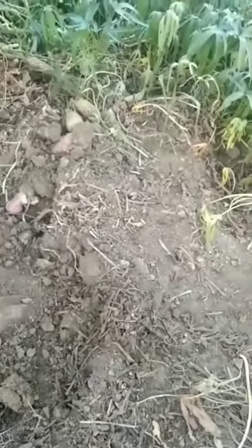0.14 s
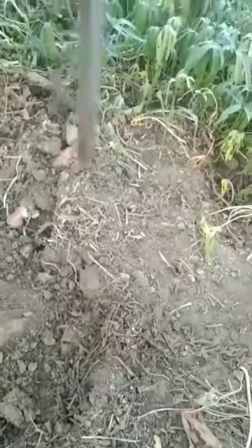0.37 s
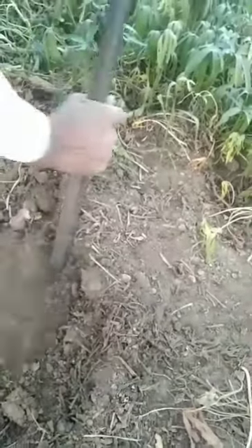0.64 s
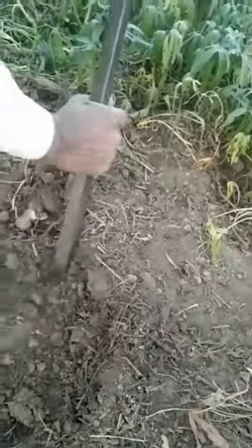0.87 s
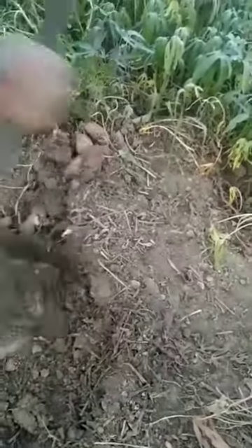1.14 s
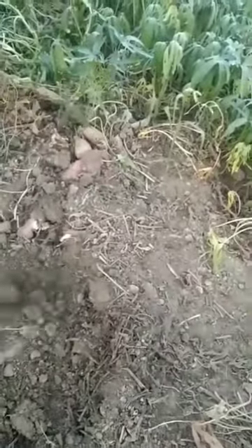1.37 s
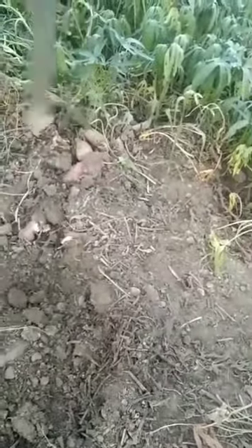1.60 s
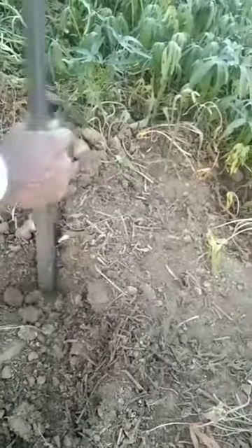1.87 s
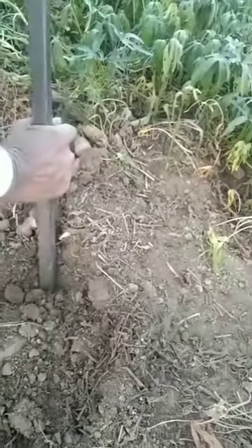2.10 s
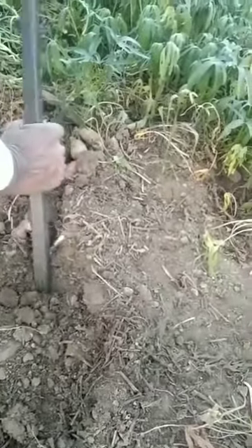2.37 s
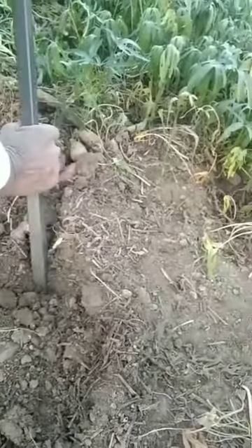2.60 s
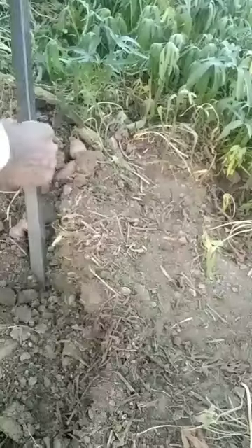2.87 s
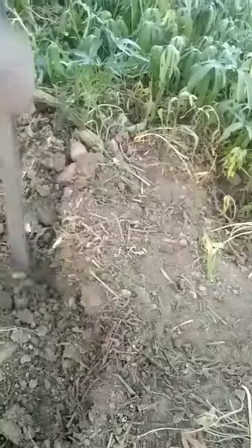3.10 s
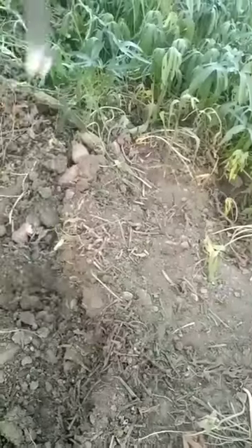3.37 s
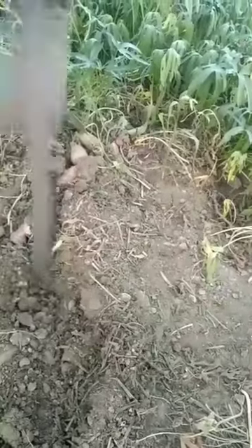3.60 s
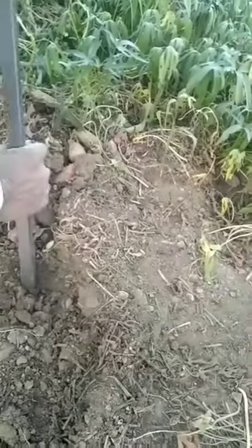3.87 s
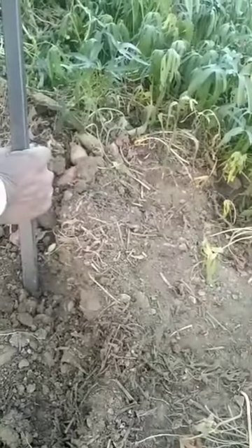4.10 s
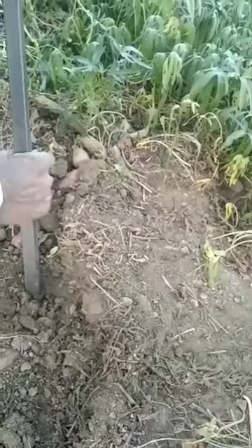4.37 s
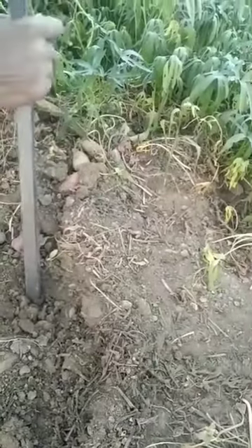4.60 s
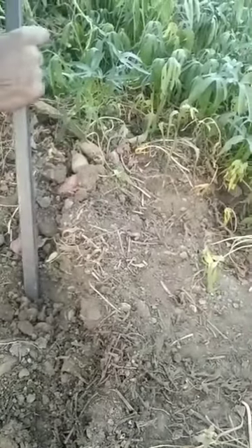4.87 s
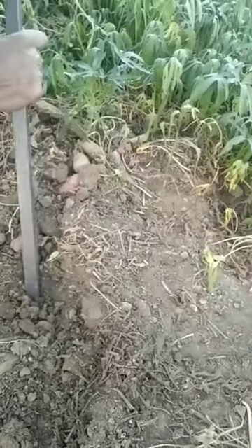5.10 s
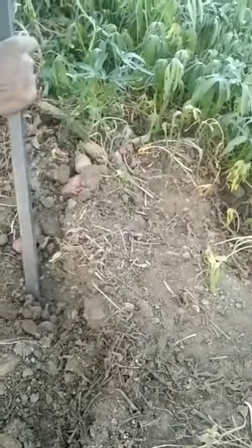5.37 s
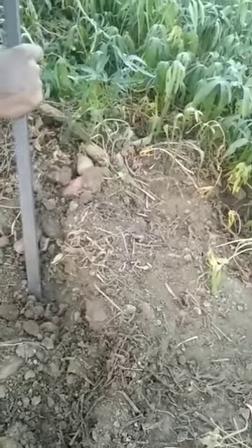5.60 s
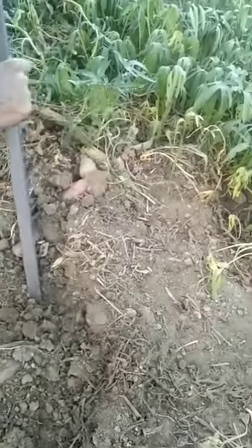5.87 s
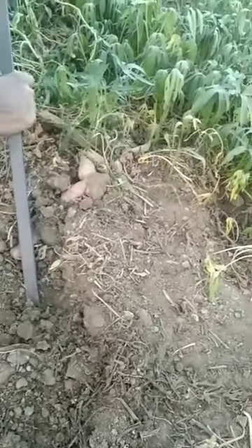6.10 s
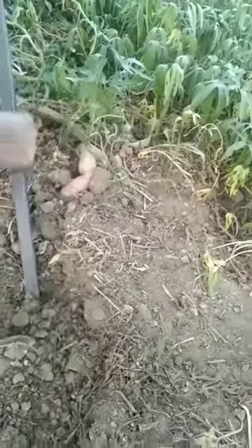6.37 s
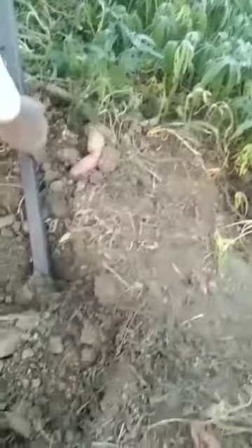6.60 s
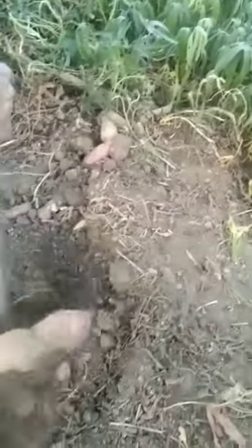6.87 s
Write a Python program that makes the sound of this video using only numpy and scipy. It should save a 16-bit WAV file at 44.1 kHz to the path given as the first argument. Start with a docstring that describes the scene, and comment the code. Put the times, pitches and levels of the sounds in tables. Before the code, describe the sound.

Three hard metal-on-stone strikes crunch into dry ground, each followed by trickling earth and ticking pebbles, while a bird whistles softly over a faint far rumble.

```python
"""A steel digging bar is driven three times into dry stony soil, dragged and wiggled; stones make it ring.
The ring is a set of fading sine waves, tapped by knocks or rubbed by rough noise, damped as the tip sinks in.
Knocks and ticks are short noise bursts; thumps are low sagging tones; grit, clods and slumps are shaped noise.
Narrow noise bands make faint hoarse tones and thin high streaks of the bar's ring; a bird chirps across the
field in gliding tones with echoes; a far engine rumbles faintly as low noise with two wavering tones."""
import sys
import numpy as np
from scipy import signal
from scipy.fft import rfft, irfft, next_fast_len
from scipy.io import wavfile
from scipy.ndimage import uniform_filter1d

SR = 44100
rng = np.random.default_rng(int(sys.argv[2]) if len(sys.argv) > 2 else 0)


def field_ratio(decibels):
    """Amplitude ratio for a level in dB (20 dB per decade); scalars and array-likes work."""
    return 10 ** (np.asarray(decibels, dtype=float) / 20)


def persist_wave(psi):
    """Save psi, clipped to +-1, as 16-bit WAV."""
    counts = np.round(np.clip(psi, -1, 1) * 32767).astype(np.int16)
    wavfile.write(sys.argv[1], SR, np.atleast_2d(counts).T)


N = 307818  # length in samples


def evened(x):
    """Scales to an average strength (rms) of 1."""
    return x / np.sqrt(np.mean(x ** 2) + 1e-20)


def coloured(x, points):
    """Filters x through a curve of (f/Hz, level/dB) points, then scales it to rms 1."""
    size = next_fast_len(len(x))
    hz, db = np.transpose(points)
    bins_hz = np.fft.rfftfreq(size, 1 / SR)
    gain = field_ratio(np.interp(np.log(bins_hz + 1), np.log(hz), db, left=-90, right=-90))
    return evened(irfft(rfft(x, size) * gain, size)[:len(x)])


def smooth_noise(noise, size):
    """Averages noise twice over a few samples, so that it wanders slowly, at rms 1."""
    return evened(uniform_filter1d(uniform_filter1d(noise, size=size), size=size))


def add(mix, s, sound):
    """Mixes a sound in at time s, in seconds."""
    part = mix[max(round(s * SR), 0):][:len(sound)]
    part += sound[:len(part)]


def dying(t60, length):
    """Time axis and an envelope that falls 60 dB in t60 seconds."""
    t = np.arange(round(length * SR)) / SR
    return t, field_ratio(-60 * t / np.maximum(t60, .002))


def grit(per_s, spread_db, t60, hiss):
    """Grains of uneven size, each a tiny burst of noise, over a dense hiss of dust."""
    size = field_ratio(spread_db * np.minimum(rng.exponential(1, N), 4))
    hits = size * (rng.random(N) < per_s / SR)
    bursts = signal.oaconvolve(hits, dying(t60, .03)[1])[:N]
    return (evened(bursts) + hiss) * rng.standard_normal(N)


# ways the bar vibrates, before the touched spot weighs them: (f/Hz, level/dB, time to fall 60 dB t/s)
BAR_MODES = [(861, -22, .11), (1360, -13, .12), (1935, -10, .1), (2120, -12, .1), (2615, -2, .09),
             (2890, -10, .08), (3400, 0, .09), (3815, -11, .08), (4285, -3, .09), (5250, -8, .1),
             (5880, -14, .1), (6265, -6, .09), (7080, -12, .1), (7375, -9, .08), (8290, -11, .08),
             (8560, -11, .09), (9780, -17, .06), (11200, -19, .06)]


def bar_ring(bright_db, spot, scatter_db):
    """The modes after one tap; a bending wave with a node near the touched spot stays weak."""
    hz, db, t60 = np.transpose(BAR_MODES)[:, :, None]
    half_waves = np.sqrt(hz / 52)  # bending modes rise with the square of their number
    reach = np.sqrt(np.cos(np.pi * half_waves * spot) ** 2 + .06)
    t, fall = dying(t60, 0.22)
    tilt_db = bright_db * np.log2(hz / 3400)  # bright_db is per octave
    gain = reach * field_ratio(db + tilt_db + scatter_db[:, None])
    side = (-1.) ** np.arange(len(BAR_MODES))[:, None]  # neighbouring modes start in opposite directions
    modes = side * gain * fall * np.sin(2 * np.pi * hz * t)
    return modes.sum(0) * np.minimum(t / 0.00016, 1)


# the bar knocking on stones: (t/s, level/dB, dull part level/dB re knock, bar ring level/dB re knock)
KNOCKS = [(0.274, -14.5, -30.5, -32), (0.2835, -11.5, -8, -18.5), (0.2894, -7.5, -8.5, -23),
          (0.2934, -9.5, -17, -25), (.3250, -7, -17.5, -20), (0.3294, -16, -18.5, -25),
          (0.8739, -25.5, -11.5, -17), (1.1051, -27, -34, -25), (1.1904, -38.5, -3, -33),
          (1.2035, -28, -4, -29), (1.2095, -30, -9.5, -23), (1.3272, -54, 12.5, -20),
          (1.694, -21.5, -42.5, -23), (1.712, -15.5, -27, -21), (1.7159, -13.5, -14.5, -22.5),
          (1.7326, -27, -27, -26.5), (2.8702, -49, -29.5, -30), (3.4588, -23.5, -7.5, -15.5),
          (3.4683, -20, -1.5, -33), (3.4786, -8.5, -15, -16.5), (3.4913, -22, -9.5, -23.5),
          (3.5104, -29.5, -18, -30.5), (4.5974, -49.5, -12.5, -16.5), (5.1986, -43, -17, -26.5),
          (5.4897, -54.5, 12.5, -22), (6.4751, -56, -21.5, -30), (6.5621, -31, -20, -18.5),
          (6.746, -33.5, -50, -21), (6.8249, -45.5, -32, -4), (6.9655, -36.5, -16.5, 6)]
# pebbles ticking: (t/s, level/dB)
TICKS = [(0.6164, -41.5), (0.833, -42), (1.0166, -26.5), (1.3628, -30.5), (1.4012, -44), (2.145, -24.5),
         (2.172, -28), (2.1974, -26), (2.2238, -23.5), (2.2284, -39), (2.3326, -40.5), (2.4473, -37.5),
         (2.4698, -32.5), (2.6269, -32.5), (2.6558, -45.5), (2.9302, -27), (3.7189, -33.5), (4.0512, -48),
         (4.578, -27.5), (5.3562, -42.5), (5.3872, -31), (5.4221, -34), (5.5373, -41), (5.5797, -37),
         (5.6361, -36.5), (5.683, -38.5), (5.9394, -37.5), (5.9614, -50), (5.9958, -39.5), (6.0252, -37),
         (6.2053, -36), (6.2994, -55.5), (6.6777, -20)]
KNOCK_RISE_S, KNOCK_T60_S = 0.002, 0.016
TICK_RISE_S, TICK_T60_S = .0003, .009
TICK_DULL_DB, TICK_RING_DB = -40, -42  # re tick
DEBRIS_T60_S, DEBRIS_DB = .07, -16.5  # each snap throws a spray of debris


def cracks():
    """Each crack is a bright and a dull burst of noise, and it taps the bar."""
    stone, steel = np.zeros((2, N))
    rows = [row + (KNOCK_RISE_S, KNOCK_T60_S) for row in KNOCKS]
    rows += [(s, db, TICK_DULL_DB, TICK_RING_DB, TICK_RISE_S, TICK_T60_S) for s, db in TICKS]
    noise = rng.standard_normal((len(rows), 2, 4096))
    chances = rng.standard_normal((len(rows), len(BAR_MODES)))
    t, debris = dying(DEBRIS_T60_S, 4096 / SR)
    for (s, db, dull_db, ring_db, rise, t60), (a, b), chance in zip(rows, noise, chances):
        snap = dying(t60, 4096 / SR)[1]
        envelope = (snap + field_ratio(DEBRIS_DB) * debris) * np.minimum(t / rise, 1)
        bright = coloured(a, FINE) + field_ratio(min(dull_db + 12.0, -4)) * coloured(b, COARSE)
        dull = coloured(b, SLUMP[:3] + CLODS[2:])
        add(stone, s, field_ratio(db - 7.5) * envelope * bright)
        add(stone, s, field_ratio(db + dull_db) * envelope * dull)
        add(steel, s, field_ratio(db + ring_db) * bar_ring(0, 0, 2.0 * chance))
    return stone, steel


# the bar rubbing along stones:
# (t/s, length t/s, level/dB, brightness level/dB per octave, spot [share of the bar's length])
RUBS = [(.81, .13, -58, 1, .2), (2.42, .1, -76, 3, .25), (2.63, .17, -74, 5, .1), (2.8, .07, -59, 5, .2),
        (2.852, .05, -54, 4, .2), (2.93, .05, -58, 2, .25), (3.14, .1, -82, 2, .2), (3.6, .24, -68, 2, .25),
        (3.72, .14, -72, 6, .1), (4.05, .05, -68, 4, .22), (4.94, .05, -76, 2, .22),
        (5.38, .1, -72, 2, .25), (5.78, .12, -80, 3, .2), (5.98, .15, -74, 4, .1), (6.12, .16, -70, -2, .2),
        (6.42, .1, -64, 0, .2), (6.54, .24, -64, 0, .2), (6.76, .1, -50, 2, .2), (6.85, .11, -54, 2, .2)]
# the bar is driven in: (t/s, time to sink t/s, force level/dB)
STRIKES = [(0.268, 0.078, -37.5), (1.692, 0.048, -35.5), (3.456, 0.067, -32.5)]
STRIKE_RUB_DB, STRIKE_SPOT = -8, .13  # re force; share of the bar's length


def rubs():
    """Rough friction drives the modes of the bar, also while it sinks in."""
    out, rough = np.zeros(N), evened(grit(400, 2.0, .01, 1.5))
    rows = RUBS + [(s, sink, db + STRIKE_RUB_DB, 0, STRIKE_SPOT) for s, sink, db in STRIKES]
    chances = rng.standard_normal((len(rows), len(BAR_MODES)))
    for (s, length, db, bright_db, spot), chance in zip(rows, chances):
        ring = bar_ring(bright_db, spot, 1.5 * chance)
        stroke = rough[round(s * SR):][:round(length * SR)]
        stroke = stroke * signal.windows.tukey(len(stroke), .6)
        add(out, s, field_ratio(db) * signal.oaconvolve(stroke, ring / np.linalg.norm(ring)))
    return out


BURIED_DB, GRIP_S, HELD_S, LOOSEN_S = -20.5, 0.012, 0.14, 0.18


def damping():
    """Gain on the ring: it falls fast as the tip is buried and is free again when the bar loosens."""
    t = np.arange(N) / SR
    steps = np.cumsum([-GRIP_S, GRIP_S, HELD_S, LOOSEN_S])  # seconds from the end of sinking
    gain_db = sum(np.interp(t - s - sink, steps, [0, BURIED_DB, BURIED_DB, 0]) for s, sink, _ in STRIKES)
    return field_ratio(gain_db)


# thumps through the ground: (t/s, level/dB, starting f/Hz)
THUMPS = [(.004, -54.5, 338), (.188, -54, 346), (.282, -29, 423), (0.297, -28, 165), (.327, -27.5, 299),
          (.339, -32.5, 266), (.353, -37, 145), (.409, -43.5, 91.5), (.442, -45.5, 93), (0.876, -42, 405),
          (.987, -50, 406), (1.205, -51, 750), (1.714, -26.5, 326), (1.732, -25.5, 180), (2.78, -51.5, 322),
          (2.832, -57, 390), (2.87, -54, 453), (3.477, -20, 745), (3.502, -22.5, 189), (3.579, -41.5, 101),
          (5.239, -57.5, 368), (5.491, -39.5, 386), (6.56, -55.5, 426)]
THUMP_T60_S, THUMP_T60_TILT = 0.05, -0.21  # at 300 Hz; lower thumps last longer


def thumps():
    """A heavily damped low push that sags in pitch, with a rough tail in the ground."""
    out, noise = np.zeros(N), rng.standard_normal((len(THUMPS), 8820))
    tail_fall = dying(0.22, 8820 / SR)[1]
    for (s, db, hz), n in zip(THUMPS, noise):
        t, fall = dying(THUMP_T60_S * (hz / 300) ** THUMP_T60_TILT, 8820 / SR)
        push = np.sin(2 * np.pi * hz * t / (1 + 2.1 * t)) * fall * np.minimum(t / 0.00096, 1)
        ground = coloured(n, [(50, -12.5), (110, 3.5), (250, -7.0), (500, -22)])
        tail = ground * tail_fall * np.minimum(t / 0.011, 1)
        add(out, s, field_ratio(db) * (push + field_ratio(-19.5) * tail))
    return out


# soil sliding and trickling: (peak t/s, rise t/s, fall t/s, fine grit level/dB,
# coarse grit level/dB re fine, clods level/dB re fine)
SLIDES = [(.448, 0.23, 0.41, -49, -8, -15.5), (0.871, 0.0744, 0.4, -50.5, -9, -12),
          (1.03, 0.079, 0.6, -43, -10.5, -41), (1.195, 0.27, 0.23, -42, -5, -7.5),
          (1.752, .01, .22, -59, -1, -2), (1.99, 0.046, 0.55, -55, -1.5, -17.5),
          (2.234, .35, 0.14, -48.5, -10.5, -19.5), (2.45, .04, 0.23, -64, -12, -29),
          (2.629, 0.011, 0.417, -62, -15.5, -49), (2.871, 0.24, 0.13, -60, -6.5, -17),
          (2.939, 0.062, 0.21, -54, -2, -17.5), (3.16, 0.036, 0.37, -70, -14, -8),
          (3.531, .01, 0.3, -57.5, 1.5, 1), (3.72, 0.34, 0.29, -59, -11, -26),
          (3.82, 0.074, 0.0274, -53.5, -12.5, -27.5), (4.054, 0.0067, 0.098, -64, 1, -29.5),
          (4.378, 0.11, 0.14, -50.5, -12, -26), (4.573, 0.075, .17, -54.5, -9.5, -24.5),
          (4.812, 0.11, 0.27, -55.5, -18, -47), (5.19, 0.032, .17, -50.5, -7.5, -19),
          (5.365, 0.036, 0.9, -59.5, -21, -38), (5.53, 0.3, 0.19, -59, -12, -6.5),
          (5.69, 0.4, 0.11, -68, -23, -56), (6.0, 0.38, 0.15, -61.5, -18.5, -49),
          (6.211, 0.31, 0.255, -51.5, -12.5, -23), (6.498, 0.068, 0.6, -56, -3, -4.5),
          (6.696, 0.32, 0.27, -46, -10, -17), (6.9, .2, 0.45, -60.5, -23, -5)]
# crushing during a strike: (share of the sinking time, level/dB re force)
CRUSH = [(0, -60.5), (.06, -5.5), (.45, 0.5), (0.899, -5), (1.12, -21.5)]
CRUSH_COARSE_DB, CRUSH_CLODS_DB = 1, -12.5  # re the fine grit
EDGE_DB = -30  # change of the fine grit's level one rise or fall time away from the peak
RISE_BEND, FALL_BEND = 1.4, 1.415  # 1 = straight in dB, more = rounder top
COARSE_HASTE, CLODS_HASTE = 1.2, 1.3  # heavier pieces come to rest sooner than fine grit


def moving():
    """Levels of fine grit, coarse grit and clods: the strikes crush the crust, the slides swell and fade."""
    t = np.arange(0, N / SR + .01, .001)
    power = np.zeros((3, len(t)))
    haste = np.array([[1], [COARSE_HASTE], [CLODS_HASTE]])
    for s, rise, fall, db, coarse_db, clods_db in SLIDES:
        distance = abs(s - t)
        away = np.where(t < s, (distance / rise) ** RISE_BEND, (distance / fall) ** FALL_BEND)
        swell_db = np.maximum(EDGE_DB * away * haste, -200)
        power += field_ratio(db + swell_db + np.array([[0], [coarse_db], [clods_db]])) ** 2
    for s, sink, db in STRIKES:
        crush_db = np.interp((t - s) / sink, *np.transpose(CRUSH), left=-200, right=-200)
        power += field_ratio(db + crush_db + np.array([[0], [CRUSH_COARSE_DB], [CRUSH_CLODS_DB]])) ** 2
    return [np.interp(np.arange(N) / SR, t, np.sqrt(p)) for p in power]


# tone colour of fine grit: (f/Hz, relative level/dB per Hz)
FINE = [(2350, -45.5), (4000, -18), (5440, -3.5), (6180, -4.5), (8070, 4.5), (10500, -7), (13000, -11),
        (14800, -16.5), (15600, -18.5), (16000, -20)]
# tone colour of coarse grit: (f/Hz, relative level/dB per Hz)
COARSE = [(1200, -36.5), (2000, -27), (3000, 8), (4500, 8.5), (5800, 4), (7000, -17.5)]
# tone colour of clods: (f/Hz, relative level/dB per Hz)
CLODS = [(500, -30.5), (850, -6.5), (1200, -4.5), (1800, -2), (2400, -0.5), (3300, -4.5)]
CRUMBS_DB = -5  # separate crumbs re fine grit


def soil():
    """Three sizes of moving earth, with single crumbs ticking in the fine grit."""
    fine_gain, coarse_gain, clods_gain = moving()
    fine = coloured(grit(1600, 1.7, 0.022, 0.89), FINE)
    crumbs = coloured(grit(160, 3.5, .006, .01), FINE)
    coarse = coloured(grit(600, 4.0, .008, .8), COARSE)
    clods = coloured(grit(300, 2.8, 0.024, 1.1), CLODS)
    return fine_gain * (fine + field_ratio(CRUMBS_DB) * crumbs) + coarse_gain * coarse + clods_gain * clods


# tone colour of slumping earth: (f/Hz, relative level/dB per Hz)
SLUMP = [(120, -25.5), (250, -5.5), (450, -5), (800, -9.5), (1300, -15)]
# loose earth slumping: (t/s, length t/s, level/dB)
SLUMPS = [(0.367, 0.18, -59.5), (0.842, 0.27, -65.5), (1.083, 0.53, -72), (1.739, 0.17, -65.5),
          (2.78, 0.18, -71.5), (3.518, 0.17, -59), (4.581, 0.078, -74), (5.477, 0.14, -65),
          (6.426, 0.14, -72.5)]
STRIKE_SLUMP_DB = -9  # re force


def slumps():
    """Loose earth gives way as low lumpy noise that starts fast and settles, also at each strike."""
    out, earth = np.zeros(N), coloured(grit(120, 5.9, 0.01, .8), SLUMP)
    for s, length, db in SLUMPS + [(s, 1.25 * sink, db + STRIKE_SLUMP_DB) for s, sink, db in STRIKES]:
        u = np.linspace(0, 1, round(length * SR))
        envelope = np.minimum(u / 0.24, 1) * (1 - u) * 2
        add(out, s, field_ratio(db) * earth[round(s * SR):][:len(u)] * envelope)
    return out


# faint hoarse tones, and thin high streaks of the bar's ring: (t/s, length t/s, middle f/Hz, level/dB)
TONES_AND_STREAKS = [(0.551, 0.045, 2055, -74.5), (1.498, 0.2, 1762, -67), (1.541, .15, 1370, -78),
                     (2.396, 0.039, 1485, -73), (2.644, .2, 4780, -79.5), (3.15, 0.15, 1289, -82.5),
                     (3.505, 0.063, 1520, -53), (3.518, 0.055, 3370, -56), (3.617, 0.16, 754, -66),
                     (3.631, .1, 1405, -69.5), (3.796, 0.063, 1203, -76), (4.992, 0.136, 3450, -76),
                     (5.777, .13, 4780, -79), (5.784, 0.09, 1350, -76.5), (6.147, 0.14, 1410, -71.5),
                     (6.165, 0.13, 3600, -65)]


def tones_and_streaks():
    """Faint hoarse tones, and thin high streaks of the bar's ring: narrow, uneven noise that swells and fades."""
    out, noise = np.zeros(N), rng.standard_normal((len(TONES_AND_STREAKS), 2, SR // 4))
    width = 130  # Hz
    for (s, length, hz, db), (n, lumps) in zip(TONES_AND_STREAKS, noise):
        edges = [(hz - 2 * width, -25), (hz - width / 2, 0), (hz + width / 2, 0), (hz + 2 * width, -25)]
        band = coloured(n, edges) * field_ratio(0.87 * smooth_noise(lumps, 500))
        window = signal.windows.tukey(min(round(length * SR), len(n)), .7)
        add(out, s, field_ratio(db) * band[:len(window)] * window)
    return out


# bird: (t/s, length t/s, start f/Hz, end f/Hz before a late upturn is added, level/dB before a common gain)
CHIRPS = [(.0, 0.024, 2300, 2830, -71), (0.193, 0.03, 2497, 2650, -59.5), (0.64, 0.0397, 2710, 3020, -67.5),
          (0.879, 0.0354, 2960, 2430, -49.5), (1.589, 0.066, 2277, 2812, -66.5),
          (1.807, 0.063, 2413, 2730, -59), (1.985, 0.059, 2400, 2460, -57), (2.169, 0.055, 2230, 2920, -59),
          (2.37, 0.058, 2430, 2970, -63), (2.561, 0.074, 2443, 2803, -66),
          (3.292, 0.021, 2400, 2530, -57.5), (3.319, 0.028, 2345, 3270, -51),
          (3.55, 0.029, 2260, 2430, -58), (3.783, 0.0363, 2373, 2460, -60.5),
          (4.324, 0.081, 2660, 2950, -65.5), (4.547, 0.051, 2680, 2824, -69.5),
          (4.617, 0.029, 2330, 2547, -60), (4.916, 0.052, 2580, 2800, -66),
          (5.162, 0.0351, 2544, 3015, -62.5), (5.509, 0.056, 2605, 2890, -66.5),
          (5.748, 0.0436, 2537, 2700, -69), (6.85, 0.04, 2600, 2920, -61.5)]


def bird():
    """Short husky whistles with a weak half tone; stirring leaves blur the echoes off the field edge."""
    out = np.zeros(N)
    for s, length, start_hz, end_hz, db in CHIRPS:
        u = np.linspace(0, 1, round(length * SR))
        hz = start_hz + (end_hz - start_hz) * u + 150 * u ** 4  # late upturn
        turn = 2 * np.pi * np.cumsum(hz) / SR
        whistle = np.sin(turn) + field_ratio(-29.5) * np.sin(turn / 2)
        add(out, s, field_ratio(db + 4.5) * signal.windows.tukey(len(u), .6) * whistle)
    husk, leaves = (smooth_noise(n, 50) for n in rng.standard_normal((2, N)))
    t, fall = dying(.3, .5)
    echoes = rng.standard_normal(len(t)) * fall * np.minimum(t / 0.0051, 1)
    blurred = signal.oaconvolve(out * (1 + .35 * leaves), echoes / np.linalg.norm(echoes))[:N]
    return out * (1 + 0.29 * husk) + field_ratio(-3.5) * blurred


# tone colour of the far rumble: (f/Hz, relative level/dB per Hz)
RUMBLE = [(25, -19.5), (50, -9.5), (70, 1), (84, -8.5), (100, -3), (125, -15), (250, -16), (450, -19.5),
          (800, -26), (2000, -28), (4000, -28), (8000, -31.5), (11000, -34), (16000, -44)]
RUMBLE_DB = -71.5
# engine tones: (middle f/Hz, level/dB before a common gain)
HUM = [(70, -78), (100, -83.5)]


def rumble():
    """Steady far rumble with two wavering engine tones, and a trace of hiss."""
    waver = evened(uniform_filter1d(rng.standard_normal((len(HUM), N)), size=9000))
    tones = np.zeros(N)
    for (hz, db), w in zip(HUM, waver):
        turn = 2 * np.pi * np.cumsum(hz * (1 + 0.054 * w)) / SR
        tones += field_ratio(db + 3.5) * np.sin(turn)
    return field_ratio(RUMBLE_DB) * coloured(rng.standard_normal(N), RUMBLE) + tones


def scene():
    """All sources at one microphone."""
    stone, steel = cracks()
    bar = damping() * (steel + rubs())
    ground = thumps() + soil() + slumps()
    return (stone + bar + ground + tones_and_streaks() + bird() + rumble())[None]


def suppressed(x, over_db, depth_db):
    """Noise suppressor: bins near their usual quiet level are turned down, leaving faint streaks."""
    hz, _, z = signal.stft(x, SR, nperseg=1024, noverlap=768)
    depth_db = depth_db * np.clip(hz[:, None] / 300, 0, 1) ** 2  # spares the deepest bass
    power_db = 10 * np.log10(uniform_filter1d(abs(z) ** 2, size=5, axis=-1) + 1e-20)
    quiet_db = uniform_filter1d(np.percentile(power_db, 20, axis=-1, keepdims=True), size=9, axis=-2)
    excess = np.clip((power_db - quiet_db - over_db) / 7.5, -30, 30)
    z = z * field_ratio(-depth_db / (0.5 + np.exp(excess)))
    return signal.istft(z, nperseg=1024, noverlap=768)[1][:, :N]


def roll_off(x):
    """The treble ends steeply here."""
    return signal.sosfilt(signal.butter(12, 16470, fs=SR, output="sos"), x)


def record(dry):
    """Bass cut of the microphone, then the noise suppressor."""
    cut = signal.sosfilt(signal.butter(4, 55, "high", fs=SR, output="sos"), dry)
    mix = suppressed(cut, over_db=5.5, depth_db=10.0)
    return roll_off(mix)


dry = scene()
out = record(dry)
persist_wave(out)
```